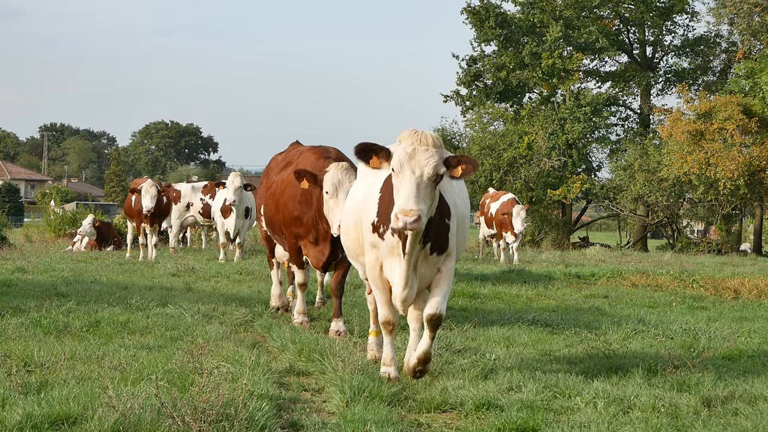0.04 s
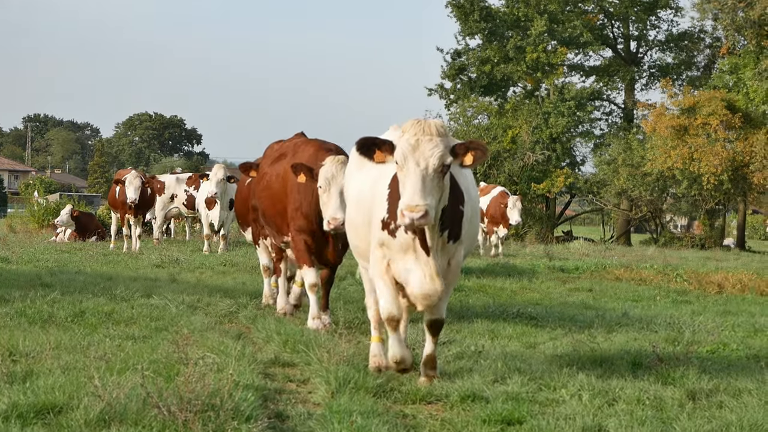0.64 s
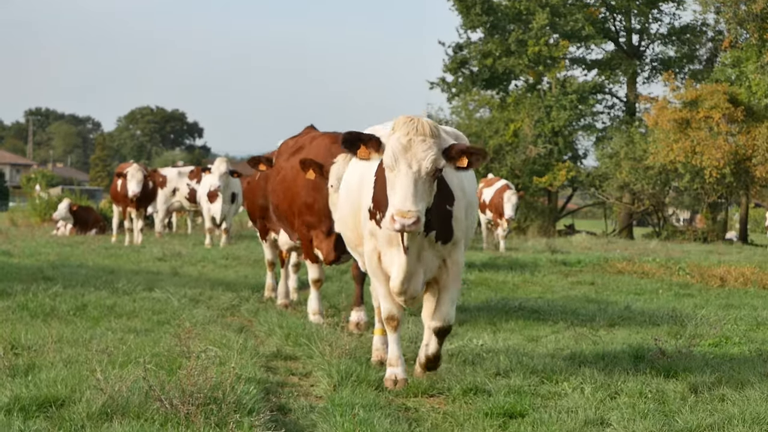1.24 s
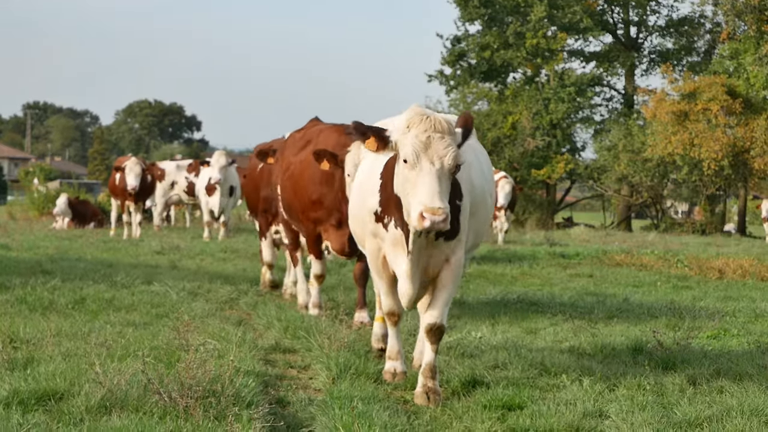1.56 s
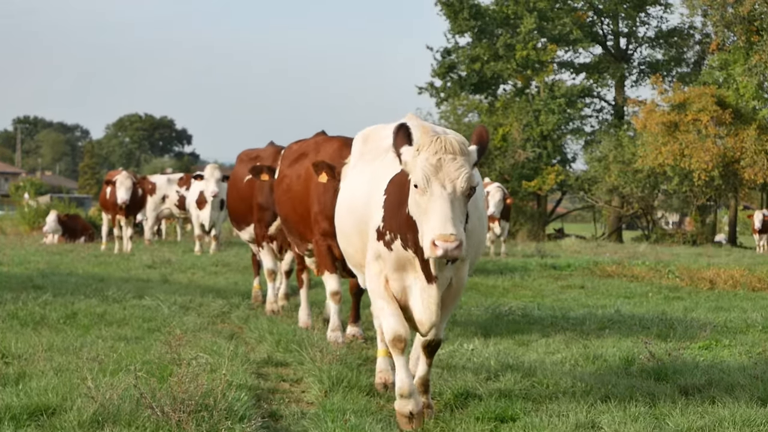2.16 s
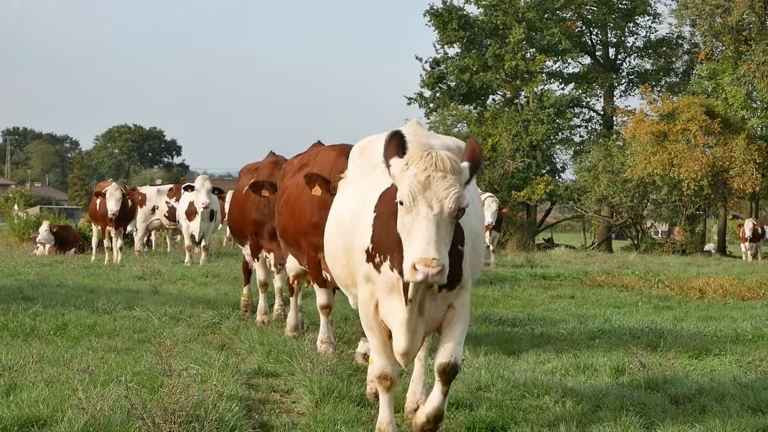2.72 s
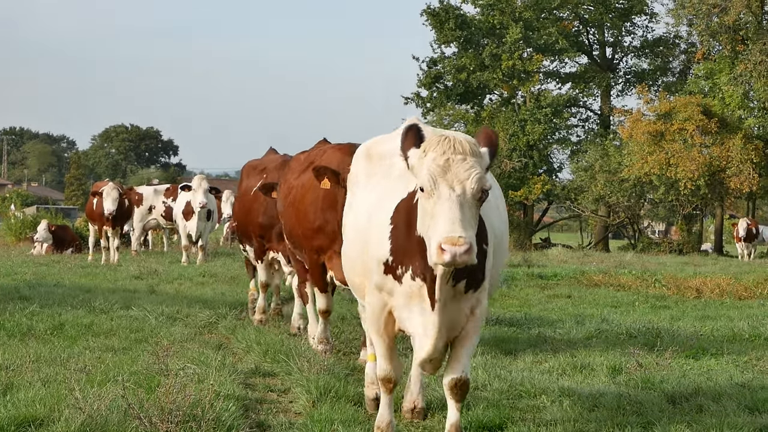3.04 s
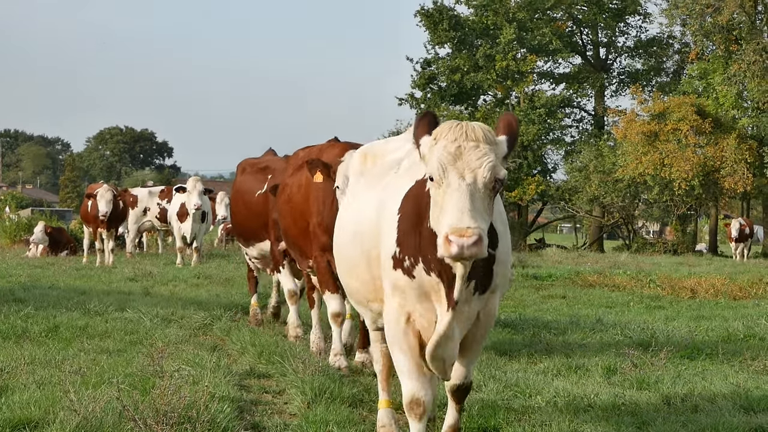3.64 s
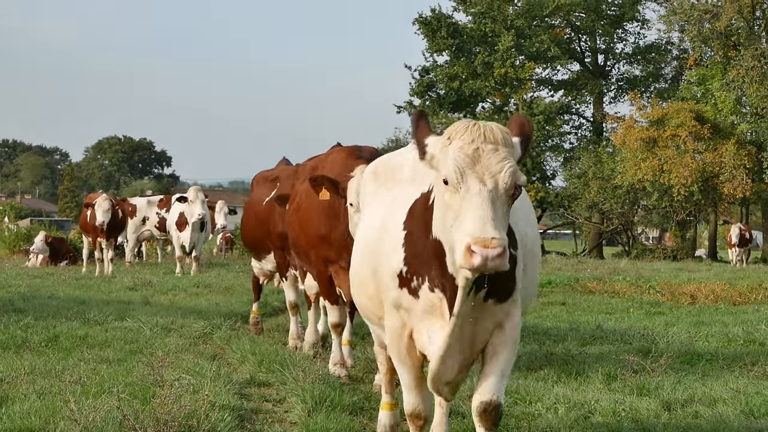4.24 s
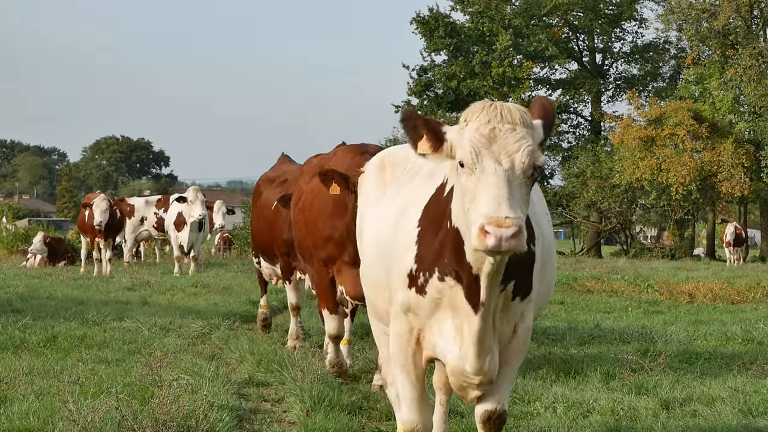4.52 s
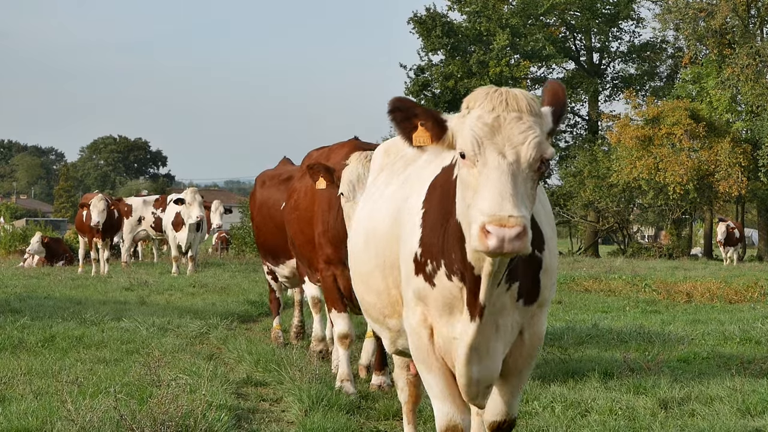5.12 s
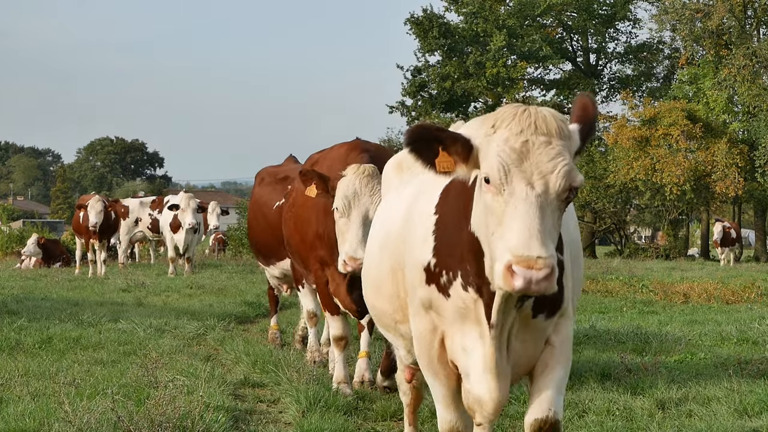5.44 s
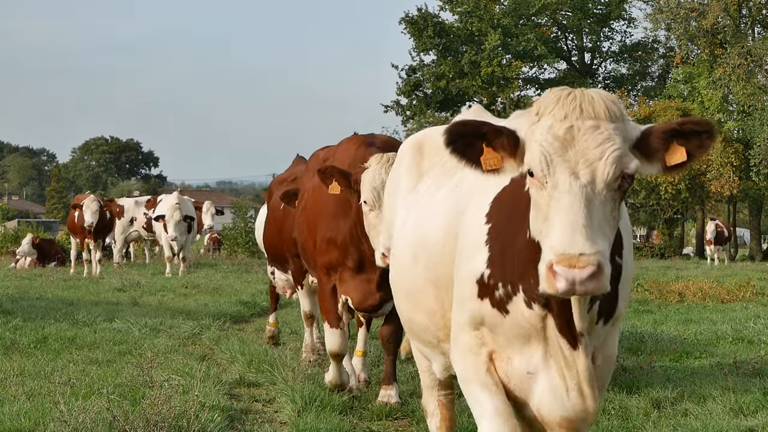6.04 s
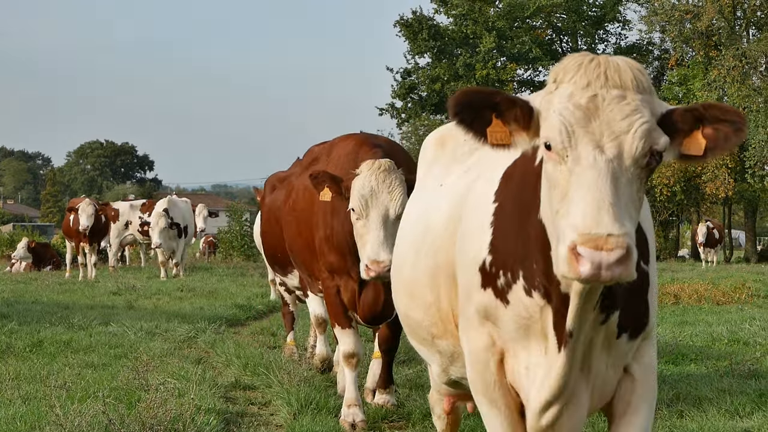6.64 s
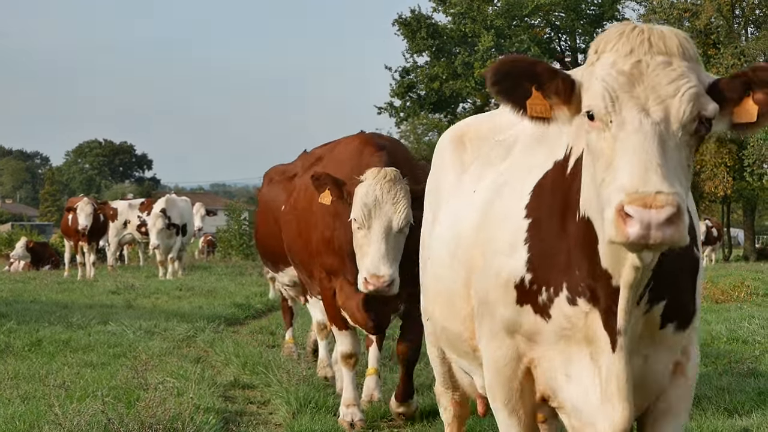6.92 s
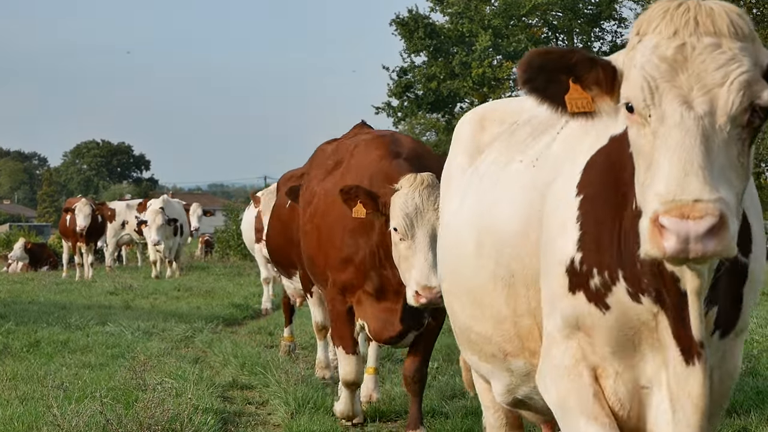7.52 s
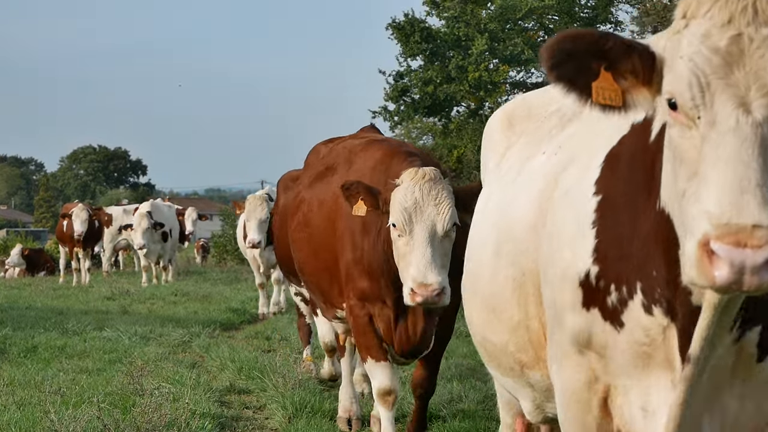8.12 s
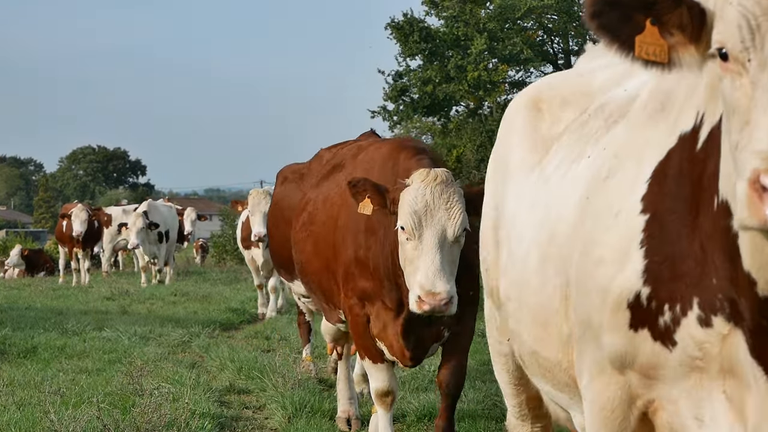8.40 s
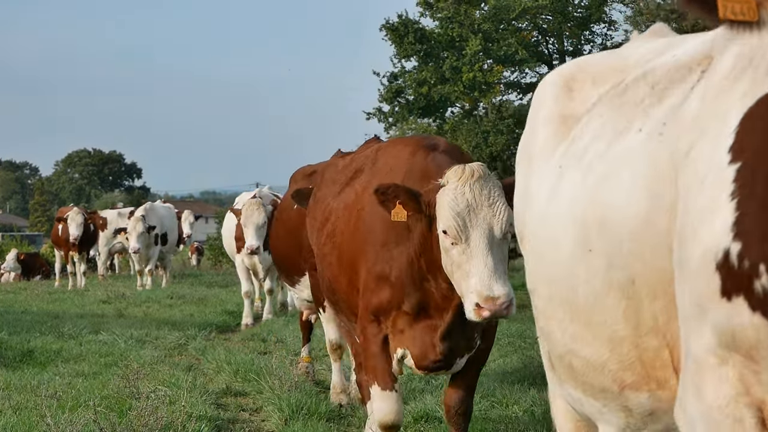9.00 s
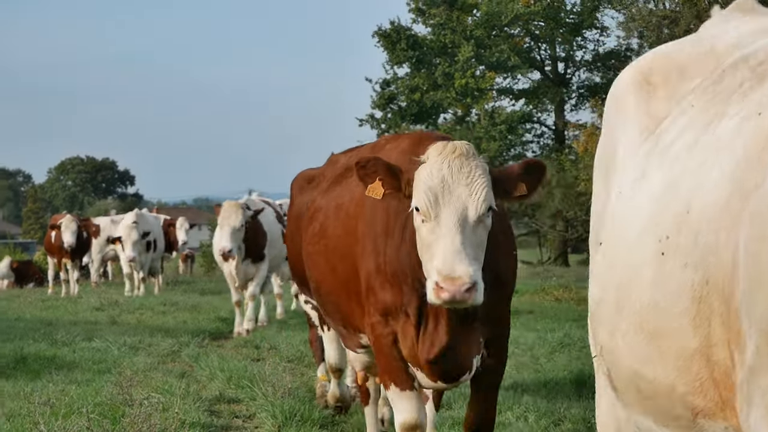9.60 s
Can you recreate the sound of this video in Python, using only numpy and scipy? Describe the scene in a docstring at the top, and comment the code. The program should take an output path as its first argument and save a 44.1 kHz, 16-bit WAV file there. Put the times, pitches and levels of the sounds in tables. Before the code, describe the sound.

In an open pasture, hooves knock softly on the turf and a few dry stalks snap over a faint outdoor hush. About three seconds in, a cow close to the microphone moos once, loudly, climbing from a low growl into a higher, rough bellow with a slight echo. Afterwards the field is quiet again, with legs brushing through the grass and small snaps. A tiny bird peeps twice, barely audible.

```python
"""An open pasture, where a cow moos once. Her vocal folds pulse and ring the throat: a low growl climbs,
breaks into a high register, turns rough and ends in an open-mouthed bellow that echoes faintly from
the trees. Hooves knock on the turf, legs brush the grass and dry stalks snap.
A small bird peeps twice over the distant outdoor hush."""
import sys
import numpy as np
from scipy import signal
from scipy.fft import rfft, irfft, next_fast_len
from scipy.io import wavfile
from scipy.ndimage import uniform_filter1d, map_coordinates

SR = 44100
rng = np.random.default_rng(int(sys.argv[2]) if len(sys.argv) > 2 else 0)


def int16_out(signal):
    """Quantize to a 16-bit WAV file."""
    q = np.round(np.clip(np.atleast_2d(signal).T, -1, 1) * 32767)
    wavfile.write(sys.argv[1], SR, q.astype(np.int16))


N = 434826
T = np.arange(N) / SR


def moo():
    """The cow's voice swells in the low register, jumps to the high one and stops."""
    during = (T > 3.15) & (T < 4.35)
    t = T[during]
    low = np.interp(t, [3.19, 3.27, 3.745, 3.765], [0, 1, 1, 0])
    high = np.interp(t, [3.742, 3.758, 4.245, 4.27], [0, 1, 1, 0])
    out = np.zeros((2, N))
    out[:, during] = low * growl(t) + high * bellow(t)
    return out


def growl(t):
    """Low register: slow, regular closures of the folds ring the shut throat one by one."""
    # The climb. Each row: time in seconds, pitch in Hz.
    melody = [(3.3, 71.47), (3.42, 79.4), (3.5, 88.76), (3.555, 94.04), (3.6, 103.0), (3.66, 121),
              (3.745, 144.7)]
    # Tone of the airflow through the shut throat. Each row: frequency in Hz, relative level in dB.
    chest_tone = [(70, -5), (130, 3.5), (190, -3), (260, 3), (340, 1.5), (420, 2), (470, -2.5),
                  (540, -31.5), (640, -17.5)]
    # Shut-mouth resonances, mids to top. Each row: centre in Hz, width in Hz, relative gain in dB.
    muzzle_modes = [(780, 123, 3.5), (1084, 55, 8), (1435, 170, 1.5), (1680, 100, -11.5)]
    buzz_modes = [(1976, 43, 5.5), (2624, 55, 5), (2930, 370, -7), (3707, 75, 0), (4000, 180, -15.5),
                  (5070, 120, -14.5), (6150, 360, -25.5)]
    rasp_modes = [(8000, 500, -4), (8800, 1100, -5.5)]
    # Mix of chest, muzzle, buzz and rasp. Each row: held level in dB at the resting pitch,
    # change in dB per octave of pitch, steepness of the swell.
    layers = [(-34.5, 9, 1.6), (-37, 5, 1.9), (-36.5, -6.5, 2.12), (-61, -3.5, 5)]
    rest_hz, chest_lag_s = 81.9, .00437  # the low tones leave the throat just after each closure
    pitch = np.interp(t, *np.transpose(melody))
    octaves = np.log2(pitch / rest_hz)
    swell_db = 20 * np.log10(np.maximum(ramp(t, 3.201, .22), 1e-3))
    chest_db, muzzle_db, buzz_db, rasp_db = [db + climb_db * octaves + steepness * swell_db
                                             for db, climb_db, steepness in layers]
    sink = 1 - .094 * octaves  # the neck stretches as the pitch climbs, and the resonances sink
    slide = 1 - .14 * np.tanh((t - 3.47) / .04)  # the thin nasal rasp slides down once
    cycles = np.cumsum(pitch * (1 + .003 * drift(70, t))) / SR
    chest = 0
    for k in range(1, 10):
        gain = from_db(at_hz(chest_tone, k * pitch) + .2 * drift(45, t))
        chest += gain * np.cos(2 * np.pi * k * (cycles - chest_lag_s * pitch))
    strength = from_db(1.1 * drift(90, t))
    # The slack folds bounce and touch again about a quarter cycle later.
    bounce = folds(cycles - .24 - .012 * drift(80, t), from_db(-5 + 2 * drift(80, t)), air=.2)
    source = folds(cycles, strength, air=.22) + bounce
    muzzle = cut(throat(source, muzzle_modes, sink), [620, 1800], "band", order=3)
    buzz = cut(throat(source, buzz_modes, sink), 1800, "high", order=4)
    buzz = cut(buzz, 6500, "low", order=4)
    breathy = folds(cycles, strength, air=1)
    rasp = cut(throat(breathy, rasp_modes, slide), [5800, 10800], "band", order=5)
    return (pan(at_level(chest, chest_db), 2.4)
            + pan(at_level(muzzle, muzzle_db), .5)
            + pan(at_level(buzz, buzz_db) + at_level(rasp, rasp_db), 1.5))


def bellow(t):
    """High register: fast closures, every second one weaker; strain adds flutter and roughness."""
    # The held note with its small scoops. Each row: time in seconds, pitch in Hz before the collapse.
    melody = [(3.775, 237.8), (3.8, 234.1), (3.867, 269.7), (3.9, 246.5), (3.96, 255), (3.99, 267.1),
              (4.065, 252.2), (4.18, 255.8)]
    # Airflow partials: smooth harmonics, then the half-way partials with their flutter sidebands.
    # Each row: multiple of the pitch, relative level in dB.
    harmonics = [(1, -0.5), (2, -22.5)]
    half_partials = [(.5, -30), (1.125, -19.5), (1.25, -13.5), (1.375, -7), (1.5, -2), (1.625, -21),
                     (2.5, -23.5)]
    # Throat resonances: mouth half shut, wide open, and the buzz on top.
    # Each row: centre in Hz, width in Hz, relative gain in dB.
    half_shut_modes = [(788, 130, 3.5), (1020, 175, -0.5), (1156, 160, -1.5), (1660, 100, -10),
                       (1923, 70, -9)]
    open_modes = [(934, 73, -1.5), (1044, 57, -1), (1145, 48, -3.5), (1257, 210, -13), (1854, 103, -14.5)]
    buzz_modes = [(2463, 80, 14.5), (2855, 100, 11.5), (3570, 150, -0.5), (4160, 200, -10),
                  (5050, 250, -18.5), (6500, 900, -21.5), (9600, 1100, -37)]
    # Mix of chest, muzzle and buzz. Each row: base level in dB, sag in dB per second,
    # boost in dB with the mouth open, loss in dB as the air runs out.
    layers = [(-16.5, 8.5, 7, 14), (-32.5, 2, 13, 13.5), (-43.5, 23.5, 5, -10.5)]
    break_s, pitch_collapse = 3.75, .52  # the jump of register; share of the pitch lost by the end
    opening = ramp(t, 3.97, .079) ** 2.8  # the mouth opens slowly at first, then flies wide
    spent = ramp(t, 4.165, .1)  # the air runs out
    pitch = np.interp(t, *np.transpose(melody)) * (1 - pitch_collapse * spent ** 2.3)
    chest_db, muzzle_db, buzz_db = [db - sag_db * (t - break_s) + open_db * opening - loss_db * spent
                                    for db, sag_db, open_db, loss_db in layers]
    shut_db = 10 * ramp(t, 4.222, .012)  # the lips close and mute muzzle and buzz
    doubling, rough = strain(t)
    dip_db = 8.5 * (1 - ramp(t, break_s, .1)) + 4.5 * rough  # the break and roughness thin the chest
    cycles = np.cumsum(pitch * (1 + .022 * rough * drift(240, t))) / SR
    flow = sum(from_db(db) * np.sin(2 * np.pi * k * cycles) for k, db in harmonics)
    for k, db in half_partials:
        gain = doubling * from_db(db + 4 * rough * drift(130, t))
        flow += gain * np.sin(2 * np.pi * k * cycles + 1.2 * rough * drift(90, t))
    flutter = np.sin(2 * np.pi * cycles / 8)
    alternation = (.5 + .2 * doubling) * np.cos(np.pi * cycles)
    strength = (1 + alternation) * from_db(4 * rough * drift(200, t) + 1.9 * doubling * flutter)
    source = folds(cycles, strength, air=.27 + 1.8 * rough)
    chest_noise = rms_one(cut(rng.standard_normal(len(t)), [290, 430], "band", order=5))
    chest = flow + from_db(-7.5) * rough * chest_noise
    muzzle = (1 - opening) * throat(source, half_shut_modes) + opening * throat(source, open_modes)
    muzzle = cut(muzzle, [640, 2100], "band", order=4)
    buzz = throat(folds(cycles, strength, air=1), buzz_modes)
    buzz = cut(cut(buzz, 2300, "high", order=4), 10500, "low", order=8)
    return (pan(at_level(chest, chest_db - dip_db), 4.2)
            + pan(at_level(muzzle, muzzle_db - shut_db), .2)
            + pan(at_level(buzz, buzz_db - shut_db), 1.5))


def strain(t):
    """Period doubling and roughness, each held within 0 to 1: an easy voice with spells of strain."""
    # Spells of strain. Each row: start in seconds, end in seconds, amount of doubling, of roughness.
    spells = [(3.72, 3.778, .5, 0.5), (3.875, 3.976, 0.57, .65), (4.015, 4.2, 0.52, 0.38),
              (4.208, 4.29, 0.5, 1.04)]
    easy, edge_s = np.array([[.081], [.19]]), .025
    out = easy
    for start, end, doubling, rough in spells:
        spell = ramp(t, start - edge_s / 2, edge_s) - ramp(t, end - edge_s / 2, edge_s)
        out = out + spell * (np.array([[doubling], [rough]]) - easy)
    return np.clip(out, 0, 1)


def folds(cycles, strength, air):
    """The vocal folds close sharply once per cycle, each time followed by a puff of turbulent air."""
    step = np.maximum(np.gradient(cycles), 1 / SR)
    samples_off = (cycles - np.round(cycles)) / step
    closures = np.sinc(samples_off) * np.exp(-(samples_off / 4) ** 2)
    puffs = rms_one(np.exp(-2.5 * (cycles % 1)) * rng.standard_normal(len(cycles))) * np.sqrt(step)
    return strength * (closures + air * puffs)


def throat(x, modes, ratio=1):
    """The throat rings in parallel resonances of alternating sign; ratio slides them by warping time."""
    clock = np.cumsum(ratio * np.ones(len(x)))
    even = np.arange(clock[0], clock[-1])
    warped = map_coordinates(x, [np.interp(even, clock, np.arange(len(x)))], order=3)
    out = 0
    for k, (hz, width_hz, db) in enumerate(modes):
        radius = np.exp(-np.pi * width_hz / SR)
        gain = (-1) ** k * from_db(db) * (1 - radius ** 2) / 2
        poles = [1, -2 * radius * np.cos(2 * np.pi * hz / SR), radius ** 2]
        out += signal.lfilter([gain, 0, -gain], poles, warped)
    return map_coordinates(out, [clock - clock[0]], order=3)


def snaps():
    """Each dry stalk breaks with one sharp crack, splinters a little and rings briefly."""
    # Stalks breaking. Each row: start in seconds, peak in dB, high cut in Hz.
    breaks = [(0.439, -45, 4500), (0.671, -31.5, 6500), (0.736, -48.5, 7000), (0.883, -46.5, 11100),
              (2.29, -46, 4200), (2.4072, -32.5, 5666), (3.6968, -20.5, 4100), (3.7056, -14.5, 11100),
              (5.627, -52, 13000), (5.75, -48, 4000), (6.9673, -45.5, 4320), (8.6501, -49.5, 6500),
              (8.694, -56, 4500), (9.196, -50, 7000), (9.709, -50, 6000), (9.8025, -50, 6050)]
    # Stalk resonances. Each row: frequency in Hz, relative level in dB, seconds to fall 60 dB.
    modes = [(3400, 3, 0.01), (3884, 4, 0.014), (4440, -2.5, 0.018), (5080, 0, 0.0084), (6290, -4, 0.0048),
             (8670, -9, 0.0059), (10230, -8, .005)]
    out, t = np.zeros(N), T[:2048]
    for s, peak_db, top_hz in breaks + faint_snaps(count=8):
        crack = (t == 0) + .12 * rng.standard_normal(len(t)) * np.exp(-t / .0012)
        snap = sum((-1) ** k * from_db(db) * ring(crack, hz, t60) for k, (hz, db, t60) in enumerate(modes))
        snap = cut(snap, [2700, top_hz], "band", order=3)
        at = round(s * SR)
        out[at:at + len(t)] += from_db(peak_db) * snap / np.abs(snap).max()
    return pan(out, .5)


def faint_snaps(count, peak_db=-54, spread_db=3, top_hz=4800):
    """Small stalks break at random moments under the rest of the herd: extra rows for snaps()."""
    return [((k + when) / count * (T[-1] - .1), peak_db + spread_db * (2 * force - 1), top_hz)
            for k, (when, force) in enumerate(rng.random((count, 2)))]


def hoof_knocks():
    """A hoof lands softly on the turf and sets one damped tone going."""
    # Dull knocks. Each row: start in seconds, level in dB, pitch in Hz, seconds to fall 60 dB.
    knocks = [(0.673, -32, 516, 0.024), (0.884, -40, 507, 0.017), (1.75, -41, 965, 0.0096),
              (2.409, -33.5, 493, 0.018), (2.966, -46, 1486, 0.062), (2.967, -49, 1020, 0.063),
              (6.967, -34, 2280, 0.0029), (8.411, -44.5, 885, 0.024)]
    out, t = np.zeros(N), T[:8192]
    for s, db, hz, t60 in knocks:
        at = round(s * SR)
        out[at:at + len(t)] += from_db(db - 60 * t / t60) * np.sin(2 * np.pi * hz * t)
    return pan(out, .54)


def grass_steps(crackles_per_s=850, spread_db=3.5):
    """A leg pushes the grass aside; blades swish past and stiff stalks crackle."""
    # Leg strokes. Each row: centre in seconds, half-length in seconds, dry swish in dB,
    # soft push in dB, crackle centre in Hz.
    strokes = [(0.488, 0.081, -58.5, -63, 3650), (1.621, 0.061, -71.5, -88, 10000),
               (5.637, 0.033, -67, -80, 9600), (6.563, 0.26, -77.5, -58.5, 2600),
               (7.217, 0.13, -77, -101, 9500), (7.967, 0.18, -78, -53, 2380),
               (8.38, 0.11, -79.5, -62, 4960), (8.66, 0.16, -75, -80, 3100), (9.031, .15, -73, -49.5, 2700),
               (9.081, .025, -66.5, -63, 3480), (9.193, 0.033, -69.5, -54.5, 2600),
               (9.472, 0.3, -82, -58.5, 2540), (9.732, 0.05, -65, -56, 2320),
               (9.807, 0.053, -68, -55, 2450)]
    # Colours of the swish and the push. Each row: frequency in Hz, relative level in dB.
    swish_tone = [(1000, -14), (2300, 2), (3000, -7), (3700, 0), (4600, -9), (6300, -9), (7800, -17),
                  (10500, -13), (13000, -32)]
    push_tone = [(120, -9.5), (350, 9.5), (600, 7.5), (1000, 0), (1700, -5), (3000, -11.5), (6000, -31),
                 (14000, -62)]
    swish, push, crackle = np.zeros((3, N))
    for s, half_s, swish_db, push_db, crackle_hz in strokes:
        near = np.abs(T - s) < half_s
        stroke = np.cos(np.pi / 2 * (T[near] - s) / half_s) ** 2
        swish[near] += from_db(swish_db) * stroke
        push[near] += from_db(push_db) * stroke
        # A few of the breaks are much louder than the rest.
        sizes = from_db(spread_db * np.minimum(rng.exponential(1, SR), 5)) * rng.standard_normal(SR)
        breaks = (rng.random(SR) < crackles_per_s / SR) * sizes
        grains = cut(breaks[:len(stroke)], [crackle_hz / 1.12, crackle_hz * 1.12], "band")
        crackle_db = 1.5 + .74 * swish_db + .26 * push_db  # follows the swish more than the push
        crackle[near] += from_db(crackle_db) * stroke * rms_one(grains)
    blades = from_db(4 * drift(250, T) - 1.5)
    herd = from_db(-76 + 3 * drift(10, T))  # the other cows never stand quite still
    return (swish + herd) * blades * noise(swish_tone) + push * noise(push_tone) + pan(crackle, .5)


def bird():
    """A small bird gives thin, wavering, slightly falling peeps."""
    # Peeps. Each row: start in seconds, length in seconds, first and last pitch in Hz, peak in dB.
    peeps = [(1.48, 0.1, 7700, 7500, -70.5), (7.598, .09, 7900, 7680, -76)]
    out = np.zeros(N)
    for s, length, start_hz, end_hz, db in peeps:
        near = (T > s) & (T < s + length)
        progress = (T[near] - s) / length
        hz = start_hz + (end_hz - start_hz) * progress + 60 * drift(150, T[near])
        out[near] = from_db(db) * np.sin(np.pi * progress) * np.sin(2 * np.pi * np.cumsum(hz) / SR)
    return pan(out, 0)


def tree_echo(x, echo_s, echo_db, scatter_db, t60):
    """One dull echo returns from the tree line, and a thin scatter from the foliage."""
    t = T[:SR]
    scatter = cut(rng.standard_normal((2, SR)), 5500, "low") * from_db(-60 * t / t60) * ramp(t, 0, .011)
    response = from_db(scatter_db) * rms_one(scatter + .5 * scatter[::-1]) / np.sqrt(SR)
    response += from_db(echo_db) * cut(np.sinc((t - echo_s) * SR), 1800, "low")
    send = cut(x, 310, "high", order=1)  # foliage returns little of the bass
    return signal.fftconvolve(send, response, axes=1)[:, :N]


def ground_reflections(x, side_db):
    """Glancing reflections off the ground reach the two sides differently, mostly in the treble."""
    glances = rng.standard_normal(400) * np.hanning(400)
    treble = cut(x.mean(axis=0), 700, "high", order=1)
    side = signal.fftconvolve(treble, glances / np.linalg.norm(glances))[:N]
    return from_db(side_db) * side * np.array([[1], [-1]])


def hush():
    """The distant outdoor bed slowly sinks and dulls, swells around the call and ends with less rumble."""
    # Colours of the early and the late hush. Each row: frequency in Hz, relative level in dB.
    early_tone = [(15, -56.5), (25, -34), (54, -14.5), (90, -7.5), (128, -5.5), (196, 0.5), (309, -7.5),
                  (475, -10.5), (604, -15.5), (1060, -14.5), (2700, -26), (4150, -30.5), (8100, -45.5),
                  (9770, -42.5), (15000, -69)]
    late_tone = [(15, -52), (25, -39.5), (98, -5.5), (135, -5), (172, 0), (286, -6), (363, -11), (529, -9),
                 (637, -18), (952, -11.5), (1460, -18.5), (3630, -29), (6900, -50), (10300, -49.5),
                 (15000, -64.5)]
    late = ramp(T, start_s=3.97, length_s=4.47)
    level_db = -49 - .6069 * T + .5 * drift(9.2, T)
    air = from_db(level_db) * (np.sqrt(1 - late) * noise(early_tone) + np.sqrt(late) * noise(late_tone))
    start_s, attack_s, end_s, release_s = 3.16, .36, 4.68, .33
    swell = ramp(T, start_s, attack_s) * np.exp(-np.maximum(T - end_s, 0) / release_s)
    swell_db = swell * (16 - 6 * (T - start_s - attack_s))  # peaks, then sags
    air += (from_db(swell_db) - 1) * cut(air, 60, "high", order=1)  # the deepest rumble barely swells
    return air - ramp(T, start_s=7.96, length_s=1.7) * cut(air, 160, "low", order=1)


def noise(spectrum):
    """Coloured stereo noise of unit power, widest in the low mids."""
    # Stereo image. Each row: frequency in Hz, left-right likeness (negative counts as 0).
    likeness = [(60, 0.7), (180, 0.16), (550, -0.27), (1640, 0.3), (4960, 0.8), (15000, 0.78)]
    # Stereo balance. Each row: frequency in Hz, left minus right in dB.
    lean = [(60, 4.5), (240, 2), (950, -1), (3760, 0.5), (15000, -0.5)]
    size = next_fast_len(N)
    hz = np.fft.rfftfreq(size, 1 / SR)
    mid, side = rfft(rng.standard_normal((2, size))) * from_db(at_hz(spectrum, hz))
    alike = np.clip(at_hz(likeness, hz), 0, 1)
    both = np.sqrt(1 + alike) * mid + np.sqrt(1 - alike) * side * np.array([[1], [-1]])
    return rms_one(irfft(both * pan(1, at_hz(lean, hz)), size)[:, :N])


def ring(x, hz, t60):
    """A damped resonance: a unit click sets a sine of height 1 ringing."""
    radius, angle = from_db(-60 / (t60 * SR)), 2 * np.pi * hz / SR
    return signal.lfilter([0, np.sin(angle)], [1, -2 * radius * np.cos(angle), radius ** 2], x + 1e-18)


def at_level(x, db):
    """Even out a voice over a few cycles, then give it its loudness."""
    power = uniform_filter1d(uniform_filter1d(x * x, size=1100), size=700)
    return from_db(db) * x / np.sqrt(np.abs(power) + 1e-4 * np.mean(x * x))


def drift(rate, t):
    """A smooth random wobble of spread near 1 that changes about rate times a second."""
    return map_coordinates(rng.standard_normal(4096), [(t - t[0]) * rate], order=3, mode="wrap")


def ramp(t, start_s, length_s):
    """Rise evenly from 0 to 1, then hold."""
    return np.clip((t - start_s) / length_s, 0, 1)


def at_hz(points, hz):
    """Read a curve on a log-frequency axis."""
    knots_hz, values = np.transpose(points)
    return np.interp(np.log(np.maximum(hz, 1)), np.log(knots_hz), values)


def cut(x, hz, kind, order=2):
    """Low-, high- or band-pass with a flat passband."""
    return signal.sosfilt(signal.butter(order, hz, kind, fs=SR, output="sos"), x)


def pan(x, db):
    """Place a sound: left minus right in dB."""
    return np.array([x * from_db(db / 2), x * from_db(-db / 2)])


def from_db(db):
    """Decibels to gain."""
    return 10 ** (np.asarray(db) / 20)


def rms_one(x):
    """Scale to unit power."""
    return x / np.sqrt(np.mean(x ** 2) + 1e-20)


def scene():
    """The cow, the small sounds of the field and the hush behind them."""
    near = moo() + snaps() + hoof_knocks()
    far = tree_echo(near, echo_s=.13, echo_db=-30, scatter_db=-21.5, t60=.97)
    return near + far + ground_reflections(near, side_db=-11.5) + grass_steps() + bird() + hush()


def record(dry):
    """The sound opens after a moment of silence; the very top is cut steeply."""
    start_s, stopband_hz = .303, 16006
    return signal.sosfilt(signal.cheby2(14, 70, stopband_hz, fs=SR, output="sos"), dry * (T > start_s))


dry = scene()
out = record(dry)
int16_out(out)
```